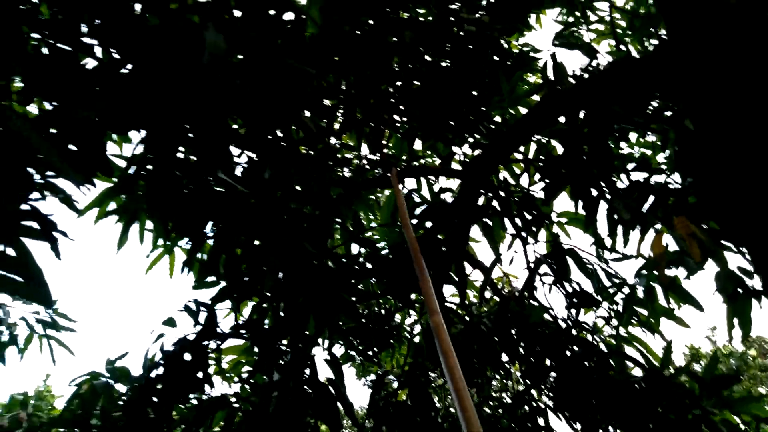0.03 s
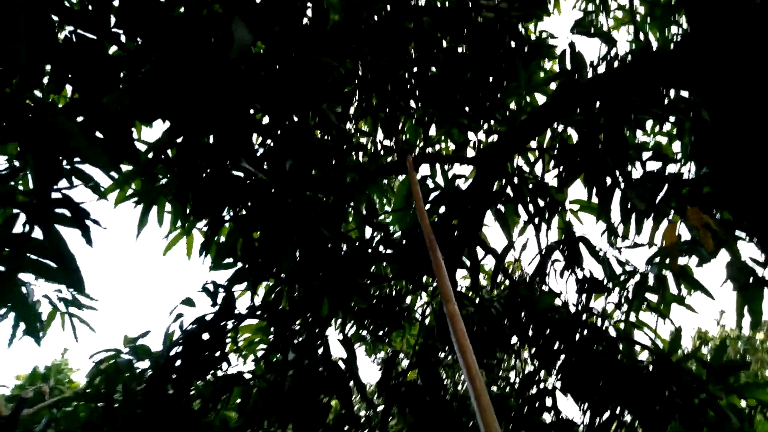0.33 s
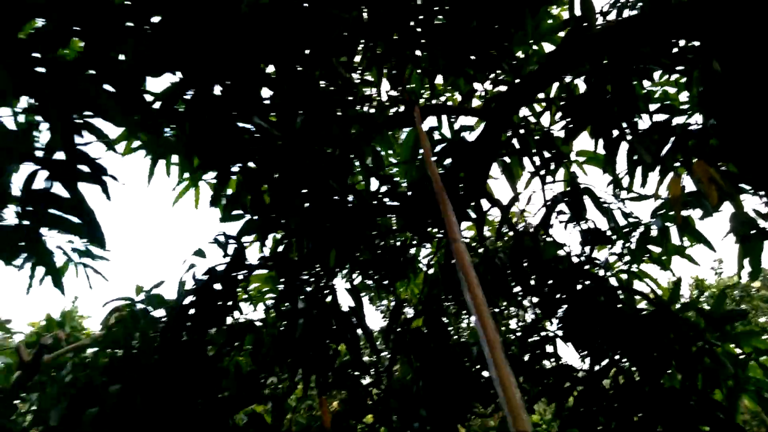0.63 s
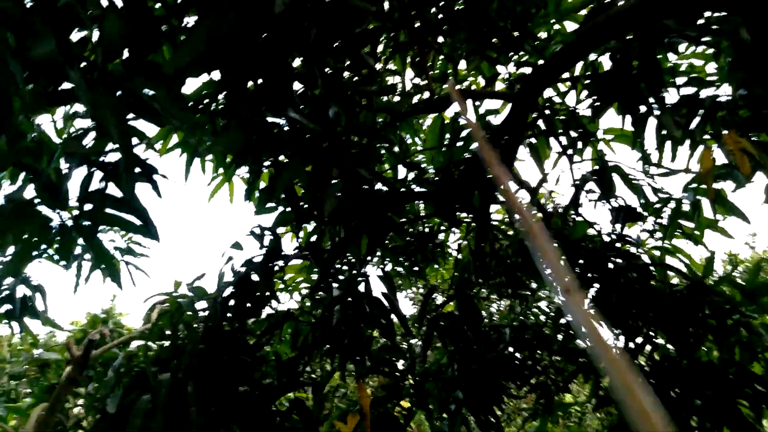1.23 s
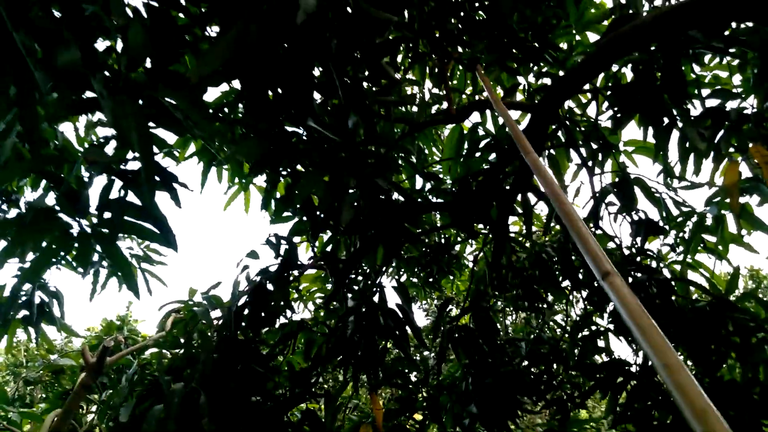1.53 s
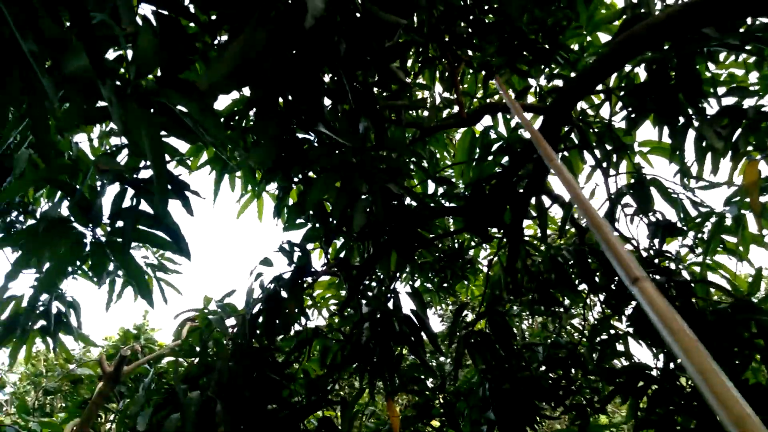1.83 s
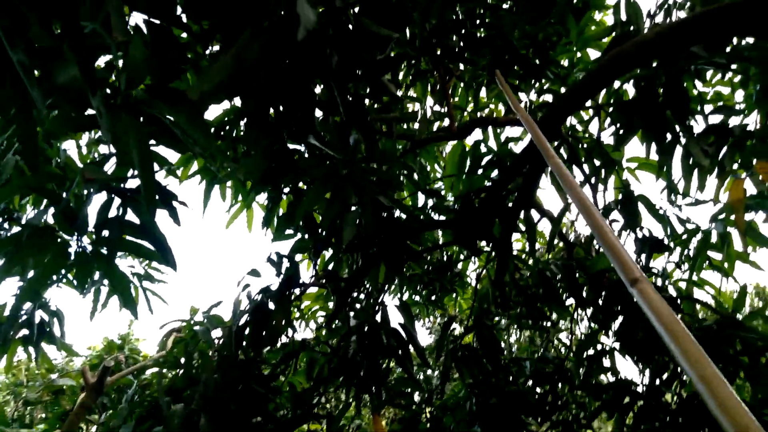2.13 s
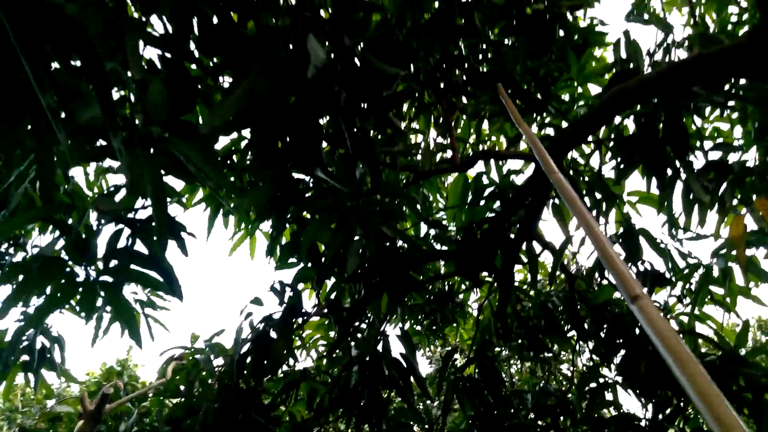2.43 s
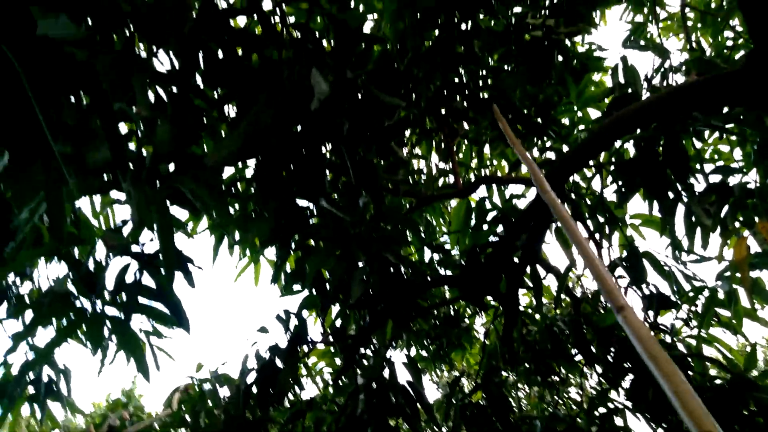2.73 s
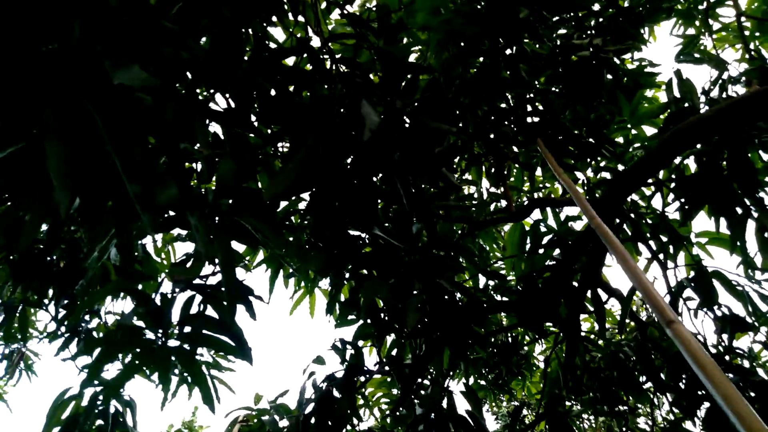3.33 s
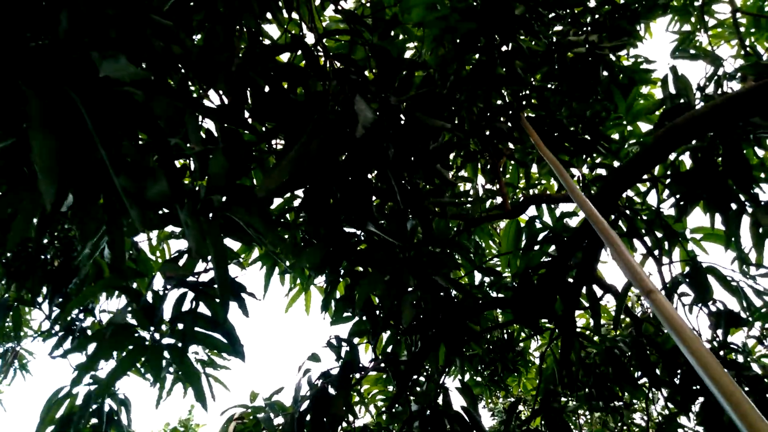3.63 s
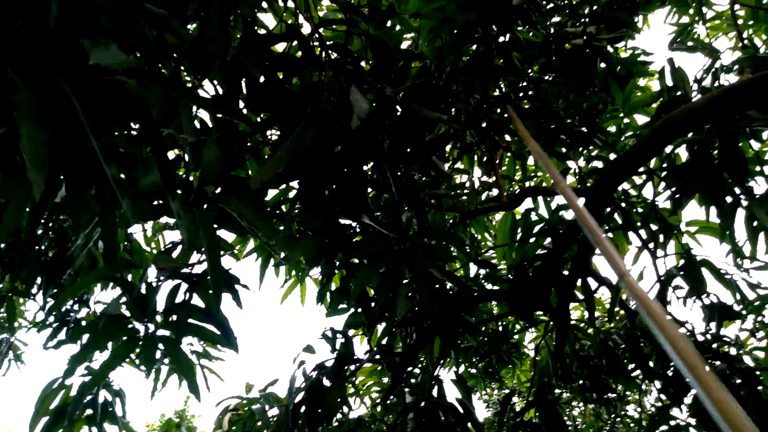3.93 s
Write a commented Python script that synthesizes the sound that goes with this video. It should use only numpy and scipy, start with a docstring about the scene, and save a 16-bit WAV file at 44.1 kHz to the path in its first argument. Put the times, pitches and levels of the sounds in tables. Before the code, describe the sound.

Leaves crackle and twigs snap as a pole tugs a branch twice, with faint birds.

```python
"""A long pole tugs twice at a branch above the microphone: stiff leaves crackle, bark scrapes,
twigs snap and the hollow pole knocks on wood. Leaves patter and dry twigs tap as the crown settles.
A nearby bird gives three rising, buzzy calls; farther off another twitters, blurred by the trees.
A thin whistle and soft, distant hoots sit over a faint outdoor rumble. Mono, from under the tree."""
import sys
import numpy as np
from scipy import signal
from scipy.fft import rfft, irfft
from scipy.io import wavfile

SR = 44100
rng = np.random.default_rng(int(sys.argv[2]) if len(sys.argv) > 2 else 0)


def wav_record(signal):
    """Record a signal, one row per channel, as 16-bit PCM in the file named by sys.argv[1]."""
    frames = np.transpose(np.atleast_2d(signal))
    bounded = np.clip(frames, -1, 1)
    # unit amplitude maps onto the largest positive 16-bit level
    quanta = np.round(bounded * 32767).astype(np.int16)
    wavfile.write(sys.argv[1], SR, quanta)


N = 176400
T = np.arange(N) / SR
TOP_HZ = 16200  # upper limit of the recorder
TWIG_ECHO_T60_S = .13


def amp(db):
    """Decibels to gain."""
    return 10 ** (np.asarray(db) / 20)


def unit(x):
    """Scale to rms 1."""
    return x / np.sqrt(np.mean(x ** 2) + 1e-30)


def curve(rows, t, column=1):
    """One column of a table, joined by straight lines."""
    return np.interp(t, np.array(rows)[:, 0], np.array(rows)[:, column])


def add(out, at, x):
    """Mix a sound in at a time in seconds."""
    i = max(int(at * SR), 0)
    out[i:i + len(x)] += x[:max(N - i, 0)]


def colour(x, points):
    """Filter by (Hz, dB) points and scale to rms 1."""
    hz, db = np.array(points).T
    f = np.maximum(np.fft.rfftfreq(len(x), 1 / SR), 1)
    gain = amp(np.interp(np.log(f), np.log(hz), db))
    return unit(irfft(rfft(x) * gain, len(x)))


def band(x, hz, octaves):
    """A bell-shaped pass band."""
    f = np.maximum(np.fft.rfftfreq(len(x), 1 / SR), 1)
    return irfft(rfft(x) * np.exp(-.5 * (np.log2(f / hz) / octaves) ** 2), len(x))


def fade(t, t60):
    """A decay that loses 60 dB in t60 seconds."""
    return np.exp(-np.log(1000) * t / t60)


def scatter(x, t60):
    """Diffuse reflections from the foliage, with about the energy of the direct sound."""
    t = T[:SR // 2]
    tail = rng.standard_normal(len(t)) * fade(t, t60)
    return signal.fftconvolve(x, tail / np.linalg.norm(tail))[:N]


def wander(hz):
    """A smooth random wobble at rates around hz, rms 1."""
    return unit(band(rng.standard_normal(N), hz, 0.88))


def contacts(per_s, spread_db):
    """Random clicks: many small, a few large."""
    chance = rng.uniform(-1, 1, N)
    hit = np.flatnonzero(np.abs(chance) < per_s / SR)
    size = np.minimum(-np.log(np.abs(chance[hit]) * SR / per_s), 5)
    out = np.zeros(N)
    out[hit] = np.sign(chance[hit]) * amp(spread_db * size)
    return out


def burst(hz, octaves, decay_s, attack_s, size=4096):
    """Dying noise in one band, cut below, with the energy of rms 1 held for decay_s."""
    t = T[:size]
    envelope = (1 - np.exp(-t / attack_s)) * np.exp(-t / decay_s)
    x = band(rng.standard_normal(size), hz, octaves) * envelope
    low_cut_hz = hz * 2 ** (-1.7 * max(octaves, .5))
    x = signal.lfilter(*signal.butter(3, low_cut_hz, "high", fs=SR), x)
    return x * np.sqrt(decay_s * SR / np.sum(x ** 2))


def leaves(per_s=3500, spread_db=3, ring_db=-3, brush_db=-1, brush_s=0.0019, echo_db=-7):
    """Leaf edges tick together overhead; each rings briefly and brushes on, and the crown blurs it."""
    # The rustle through both tugs and after. Each row: time in seconds, level in dB.
    rustle = [(0,-37),(.06,-27),(.1,-28.5),(.135,-34.5),(.19,-29.5),(.24,-28),(.285,-34.5),(.33,-32.5),(.4,-38.5),(.47,-39.5),(.55,-37),(.66,-40),(.745,-45),(.765,-56),(.82,-61.5),(.88,-72),(1.0,-77),(1.11,-51.5),(1.135,-34.5),(1.165,-34.5),(1.225,-43),(1.262,-30.5),(1.3,-37.5),(1.36,-39),(1.415,-35),(1.47,-40.5),(1.58,-44.5),(1.595,-65),(1.66,-52),(1.76,-77),(1.86,-74),(2.0,-68),(2.03,-56),(2.14,-74),(2.35,-84),(2.39,-63),(2.52,-100),(2.98,-99.5),(3.06,-64),(3.13,-77),(3.29,-79),(3.34,-71),(3.44,-83),(3.66,-96.5),(3.69,-65),(3.74,-59),(3.85,-98),(4,-85)]
    # Tone of stiff leaves. Each row: frequency in Hz, relative level in dB.
    leaf_tone = [(200,-46.5),(550,-32),(900,-23),(1250,-14.5),(2000,-16),(3500,-8.5),(5000,-6),(6500,-4),(8400,0.5),(10500,-8.5),(13000,-12),(16000,-20)]
    ticks = unit(contacts(per_s, spread_db))
    ring_hz = np.geomspace(1500, 14000, num=30)
    rings = unit(sum(band(contacts(per_s / 20, spread_db), hz, 0.077) for hz in ring_hz))
    crackle = ticks + amp(ring_db) * rings
    # A short hiss trails each tick.
    trailing_power = signal.lfilter([1], [1, -np.exp(-1 / (brush_s * SR))], crackle ** 2)
    brush = unit(np.sqrt(trailing_power) * rng.standard_normal(N))
    crown = crackle + amp(brush_db) * brush + amp(echo_db) * scatter(crackle, t60=.03)
    return colour(crown, leaf_tone) * amp(curve(rustle, T))


def patter(per_s=220, low_hz=2000, high_hz=11000, spread_db=3.6, dulling_db=-5):
    """Single leaves touch softly, each in its own narrow band; the higher ones are weaker."""
    # Patter of the settling crown. Each row: time in seconds, level in dB.
    settling = [(0,-61),(.9,-66.5),(1.0,-63),(1.7,-66.5),(2.12,-70.5),(2.3,-72),(2.55,-79.5),(2.95,-87),(3.25,-66),(3.55,-74.5),(3.75,-70.5),(4,-77.5)]
    out = np.zeros(N)
    for when, pitch, chance in rng.random((int(per_s * N / SR), 3)):
        touch = burst(low_hz + (high_hz - low_hz) * pitch, octaves=.02, decay_s=.015, attack_s=.002)
        size = min(-np.log(1 - chance), 3)
        add(out, when * N / SR, amp(dulling_db * pitch + spread_db * size) * touch)
    return unit(out + scatter(out, t60=0.14)) * amp(curve(settling, T))


def branches():
    """Bark catches and slips in woody clicks; the swaying crown stirs a low rumble."""
    # Scraping bark and the crown's rumble. Each row: time in seconds, level in dB.
    scrape_level = [(0,-50.5),(.06,-39),(.13,-48.5),(.2,-42),(.3,-44.5),(.46,-59.5),(.54,-49.5),(.62,-70),(.72,-73),(.79,-79),(.86,-64),(.95,-56.5),(1.0,-73),(1.12,-84.5),(1.16,-55),(1.22,-60.5),(1.265,-49.5),(1.33,-48),(1.39,-41),(1.46,-48.5),(1.515,-43.5),(1.58,-51.5),(1.6,-69),(1.72,-100),(1.85,-118.5),(4,-85)]
    sway_level = [(0,-72),(.75,-68.5),(1.55,-74),(1.95,-74),(2.15,-88),(3.2,-80.5),(4,-91)]
    # Tone of each. Each row: frequency in Hz, relative level in dB.
    wood_tone = [(80,-39.5),(220,-27.5),(330,-10),(520,-5),(900,-2.5),(1500,-4.5),(2300,-6),(4000,-15),(9000,-42.5)]
    sway_tone = [(25,-27.5),(55,2),(120,-7.5),(220,-16),(450,-21),(2000,-58)]
    # Soft rubs and hollow rings among the branches.
    # Each row: start in seconds, level in dB, centre in Hz, width in octaves, decay in seconds.
    rubs = [(0.042,-53,450,0.48,0.12),(0.591,-61,300,0.3,0.032),(1.255,-44.5,450,0.33,.012),(1,-61.5,204,0.61,0.012),(2.409,-63.5,910,0.65,0.038)]
    slips = contacts(per_s=1100, spread_db=3.5)
    scrape = colour(slips + scatter(slips, t60=0.016), wood_tone) * amp(curve(scrape_level, T))
    sway = colour(rng.standard_normal(N), sway_tone) * amp(curve(sway_level, T))
    out = scrape + sway
    for at, db, hz, octaves, decay_s in rubs:
        add(out, at, amp(db) * burst(hz, octaves, decay_s, attack_s=0.0023, size=16384))
    return out


def outdoor_air(level_db=-82):
    """A faint, steady rumble all around the microphone."""
    # Tone of the open air. Each row: frequency in Hz, relative level in dB.
    air_tone = [(20,-34),(38,-24.5),(54,-5),(80,-3),(120,-2),(200,-14),(400,-13.5),(1000,-21),(3000,-24.5),(8000,-27.5),(16000,-34.5)]
    return amp(level_db) * colour(rng.standard_normal(N), air_tone)


def twig_snaps(dull_hz=12500, echo_db=-9):
    """Sharp cracks overhead, slightly dulled by the foliage, each with a short scattered tail."""
    # Twigs snapping and leaves slapping.
    # Each row: start in seconds, level in dB, centre in Hz, width in octaves, decay in seconds.
    snaps = [(0.0195,-24,8300,0.25,0.0014),(0.098,-24.5,8200,0.36,0.0057),(.140,-26,4930,2.5,0.0022),(0.1564,-18.5,8650,0.77,0.0012),(.173,-19.5,8050,0.13,0.0026),(.186,-23,6640,0.5,0.0038),(.232,-24.5,6200,0.14,0.0021),(.238,-20,6500,1.2,0.0017),(0.304,-23,6600,2.5,0.00089),(0.34,-32,6040,1.2,0.0012),(0.355,-22.5,3230,0.084,0.0018),(0.3572,-24.5,4800,0.99,0.0028),
             (0.4903,-23.5,6360,1.63,0.0027),(0.5281,-31,4850,1.48,0.0066),(0.5789,-25.5,5000,1.5,0.0014),(0.614,-26,3800,1,0.00039),(0.642,-31,4440,1.45,0.0043),(0.684,-34,4220,1.12,0.0042),(0.748,-38,3830,1.12,0.0027),(.829,-34.5,5000,1.3,0.004),(0.852,-44,4750,0.85,0.012),(0.9093,-36.5,4600,0.71,0.0017),(1.028,-56,2170,0.86,0.0088),(1.045,-45.5,5300,1.4,0.0083),
             (1.1062,-29,4430,0.8,0.0019),(1.124,-34,1930,0.51,0.0069),(1.1453,-23,3550,1.44,0.0044),(1.151,-25.5,4500,1.6,0.0026),(1.253,-25.5,3460,2.35,0.0022),(1.258,-23.5,3450,0.78,0.0012),(1.3197,-33,3480,1.5,0.0039),(1.409,-17.5,7500,1.1,0.0021),(1.504,-40.5,780,0.86,0.0085),(1.517,-43,1980,0.83,0.0081),(1.537,-39,4400,0.65,0.003),(1.6097,-31.5,7000,1.36,0.0011),(1.672,-42,5300,1,0.0016),(1.7085,-47,4300,0.69,0.0017),(1.779,-62,6070,.9,0.0012),
             (1.937,-46.5,7000,0.48,0.008),(1.9575,-44,7000,0.69,0.0021),(2.015,-39.5,5560,0.71,0.0041),(2.025,-49.5,6000,0.74,.004),(2.222,-54,8000,.4,0.0018),(2.372,-49,6500,0.77,0.0026),(3.021,-55.5,10000,.45,0.0023),(3.058,-51.5,6700,.7,0.002),(3.07,-59,7620,0.3,0.0019),(3.33,-58.5,6880,0.45,0.0051),(3.68,-51,7400,0.33,0.0042),(3.727,-52.5,6450,0.91,0.0052)]
    out = np.zeros(N)
    for at, db, hz, octaves, decay_s in snaps:
        add(out, at, amp(db) * burst(hz, octaves, decay_s, attack_s=0.00021))
    out = signal.sosfilt(signal.butter(2, dull_hz, fs=SR, output="sos"), out)
    return out + amp(echo_db) * scatter(out, TWIG_ECHO_T60_S)


def trill(pitch, depth_hz, rate_hz=132):
    """Phase of a bird's note whose pitch shakes fast and unevenly."""
    rate = rate_hz * (1 + 0.36 * wander(60)[:len(pitch)])
    shake = np.sin(2 * np.pi * np.cumsum(rate) / SR)
    return 2 * np.pi * np.cumsum(pitch + depth_hz * shake) / SR


def near_bird(overtone_db=-30.5, flutter_db=5.5, direct_db=-3, echo_db=-3.5, chip_echo_db=-11):
    """A buzzy note flutters, jumps upward and ends in three sharp chips; the trees scatter it."""
    # The calls and their closing chips. Each row: time in seconds, relative level in dB.
    calls = [(0.522,-48.5),(1.603,-52),(3.142,-53)]
    closing_chips = [(.855,-30),(0.8618,-29),(.868,-30),(1.939,-28),(1.9463,-30.5),(1.9605,-40.5),(3.488,-32.5),(3.492,-33.5),(3.4996,-39)]
    # One call. Each row: seconds into it, pitch in Hz, trill depth in Hz, relative level in dB.
    shape = [(0,2750,100,-14),(.04,2736,283,-17),(.085,3081,535,-3),(.12,3170,528,-1.5),(.17,3047,453,-15.5),(.205,3076,185,-21),(.225,2950,80,-8),(.255,2896,255.5,-8),(.285,3650,600,-9),(.305,4600,720,1),(.335,4570,700,6),(.36,4276,509,-5),(.375,4080,312,-37.5)]
    song, chips, t = np.zeros(N), np.zeros(N), T[:int(shape[-1][0] * SR)]
    for at, db in calls:
        phase = trill(curve(shape, t), curve(shape, t, column=2))
        voice = np.sin(phase) + amp(overtone_db) * np.sin(2 * phase)
        add(song, at, amp(db + curve(shape, t, column=3)) * voice)
    song *= amp(flutter_db * wander(70))
    chip_s, chip_hz, fall_hz_per_s = .0011, 4030, 270000
    u = T[:SR // 50] - .01  # seconds from the middle of a chip
    sweep = np.sin(2 * np.pi * (chip_hz - fall_hz_per_s * u / 2) * u)
    chip = np.exp(-.5 * (u / chip_s) ** 2) * sweep
    for at, db in closing_chips:
        add(chips, at + u[0], amp(db) * chip)
    echo = scatter(amp(echo_db) * song + amp(chip_echo_db) * chips, t60=0.41)
    return amp(direct_db) * song + chips + echo


def whistle(waver=0.011):
    """A faint, thin note that sags slightly."""
    # The note. Each row: start in seconds, level in dB, length in seconds, first and last pitch in Hz.
    notes = [(0.66,-49.5,0.097,2085,1970)]
    out = np.zeros(N)
    for at, db, length, start_hz, end_hz in notes:
        u = np.linspace(0, 1, int(length * SR))
        pitch = start_hz + (end_hz - start_hz) * u + start_hz * waver * wander(60)[:len(u)]
        swell = np.sqrt(4 * u * (1 - u))
        add(out, at, amp(db) * swell * np.sin(2 * np.pi * np.cumsum(pitch) / SR))
    return out


def pole(attack_s=0.00076, low_cut_hz=349.7):
    """The hollow pole hits a branch and bounces; it is too thin to radiate bass."""
    # The knock and its bounces. Each row: start in seconds, relative level in dB.
    knocks = [(1.3605,-20),(1.36375,-23),(1.3735,-29)]
    # Modes of the pole. Each row: frequency in Hz, relative level in dB, seconds to fall 60 dB.
    modes = [(385,-20,.055),(538,-7.5,.06),(616,-8,0.06),(902,-2.5,0.033),(1294,-9,0.031),(1752,-9.5,0.041)]
    out, t = np.zeros(N), T[:SR // 4]
    ring = sum(amp(db) * np.sin(2 * np.pi * hz * t) * fade(t, t60) for hz, db, t60 in modes)
    for at, db in knocks:
        add(out, at, amp(db) * ring * (1 - np.exp(-t / attack_s)))
    return signal.sosfilt(signal.butter(4, low_cut_hz, "high", fs=SR, output="sos"), out)


def far_bird(fall_hz=1004, depth_hz=647, waver_hz=140, flutter_db=4.5, direct_db=-3, echo_db=1):
    """High, unsteady falling notes, about ten a second, heard more off the trees than directly."""
    # The twitter. Each row: start in seconds, relative level in dB, pitch near the note's top in Hz.
    notes = [(2.155,-59.5,6980),(2.28,-60,6840),(2.384,-60,6540),(2.47,-62,6990),(2.57,-60.5,7015),(2.665,-62,6810),(2.775,-61,6600),(2.89,-63.5,6600),(2.989,-64,6500),(3.095,-60,6950),(3.205,-65,6200)]
    note_s = .11
    out, u = np.zeros(N), np.linspace(0, 1, int(note_s * SR))
    swell = np.sin(np.pi * u ** 0.46)
    for at, db, top_hz in notes:
        pitch = top_hz - depth_hz / 2 - fall_hz * u + waver_hz * wander(28.9)[:len(u)]
        add(out, at, amp(db) * swell * np.sin(trill(pitch, depth_hz)))
    out *= amp(flutter_db * wander(40))
    return amp(direct_db) * out + amp(echo_db) * scatter(out, t60=0.42)


def hoots(hz=324.3, waver=0.067, echo_db=-1):
    """Soft, wavering low notes from far off, perhaps a dove."""
    # The hoots. Each row: start in seconds, level in dB, length in seconds.
    notes = [(2.44,-63,0.16),(2.85,-78.5,0.065),(3.252,-70.5,0.082)]
    swell = np.zeros(N)
    for at, db, length in notes:
        add(swell, at, amp(db) * np.sin(np.linspace(0, np.pi, int(length * SR))))
    pitch = hz * (1 + waver * wander(35))
    voice = swell * np.sin(2 * np.pi * np.cumsum(pitch) / SR)
    return voice + amp(echo_db) * scatter(voice, t60=0.49)


def twig_taps(attack_s=0.00079, spread_db=2, echo_db=-5):
    """Dry twigs touch and ring briefly, each a little differently."""
    # The taps. Each row: start in seconds, relative level in dB.
    taps = [(3.612,-68),(3.708,-59),(3.724,-52.5),(3.8955,-61),(3.9634,-64.5)]
    # Modes of a dry twig. Each row: frequency in Hz, relative level in dB, seconds to fall 60 dB.
    modes = [(1330,-2,0.049),(2377,6,0.036),(3450,-11.5,0.11),(4570,-7.5,0.056),(5243,-16,.11),(6540,-8,0.079)]
    out, t = np.zeros(N), T[:SR // 4]
    for at, db in taps:
        ring = np.zeros(len(t))
        for hz, mode_db, t60 in modes:
            gain = amp(mode_db + spread_db * rng.standard_normal())
            ring += gain * np.sin(2 * np.pi * hz * t) * fade(t, t60)
        add(out, at, amp(db) * ring * (1 - np.exp(-t / attack_s)))
    return out + amp(echo_db) * scatter(out, TWIG_ECHO_T60_S)


def scene():
    """The tree overhead, birds near and far and the still air, all at one microphone."""
    air = outdoor_air()
    tree = leaves() + patter() + branches() + twig_snaps() + twig_taps() + pole()
    return (tree + near_bird() + far_bird() + whistle() + hoots() + air)[None]


def record(dry):
    """The recorder cuts the highest treble steeply."""
    return signal.sosfilt(signal.ellip(10, .2, 80, TOP_HZ, fs=SR, output="sos"), dry)


dry = scene()
out = record(dry)
wav_record(out)
```